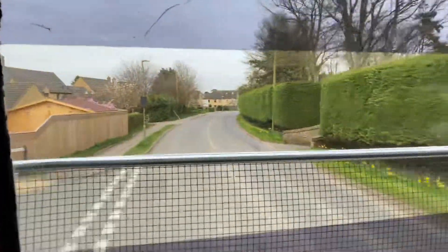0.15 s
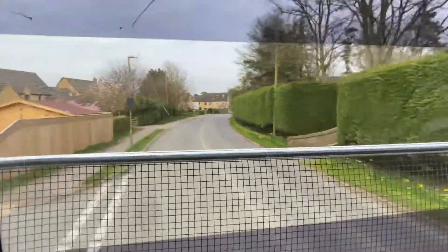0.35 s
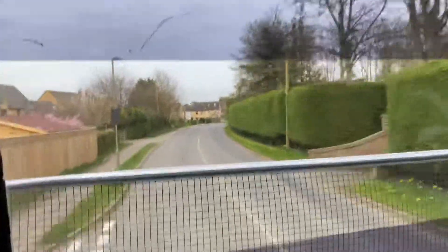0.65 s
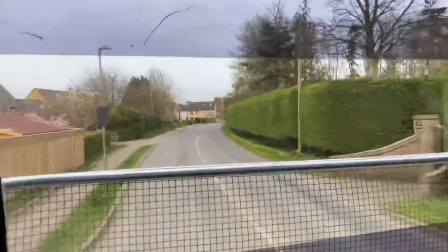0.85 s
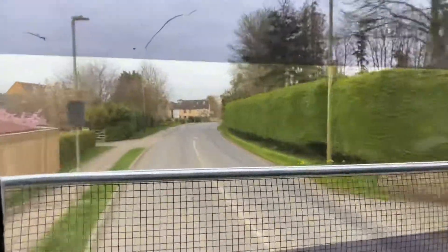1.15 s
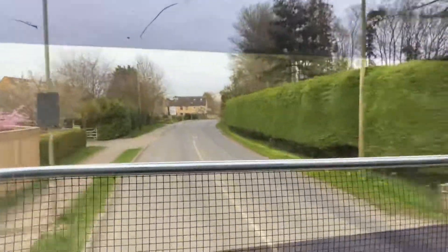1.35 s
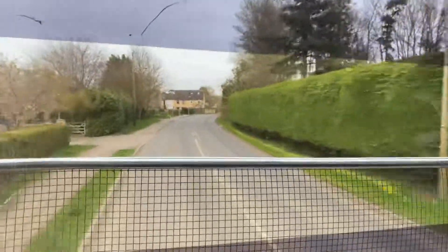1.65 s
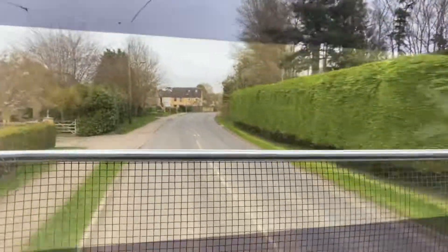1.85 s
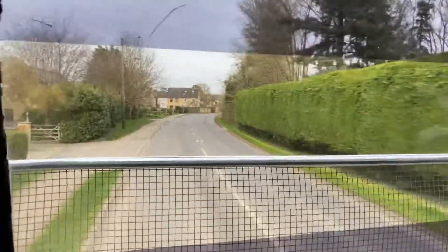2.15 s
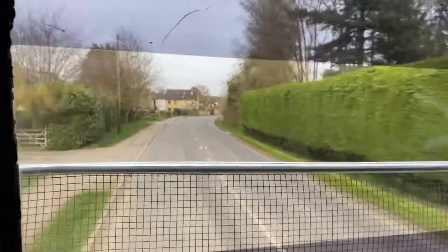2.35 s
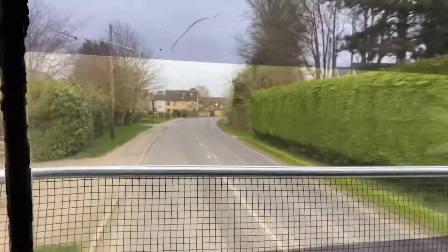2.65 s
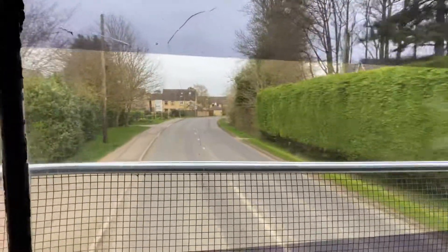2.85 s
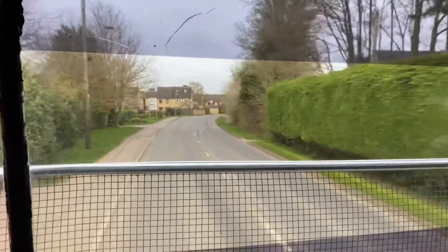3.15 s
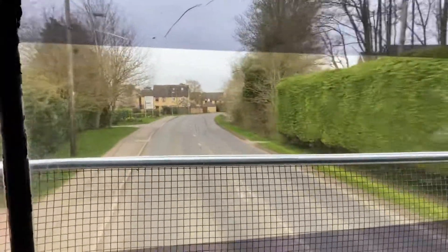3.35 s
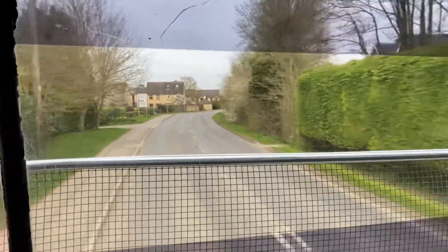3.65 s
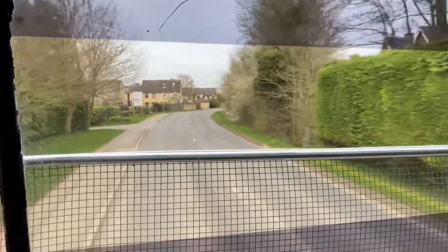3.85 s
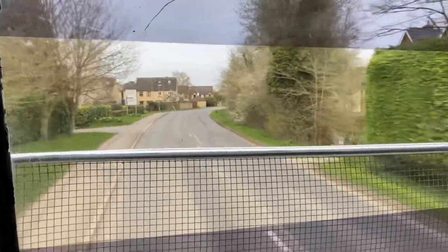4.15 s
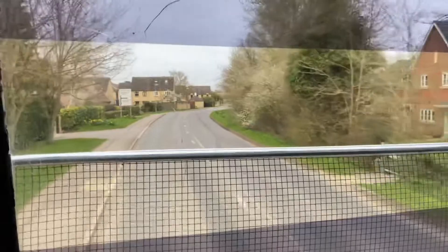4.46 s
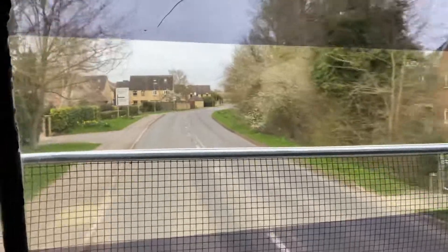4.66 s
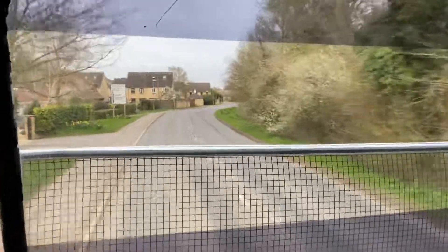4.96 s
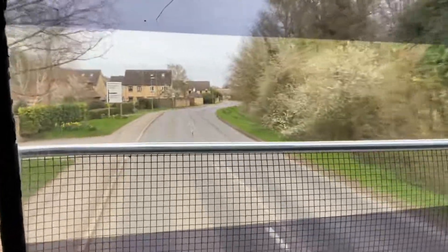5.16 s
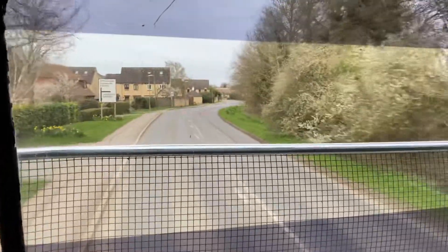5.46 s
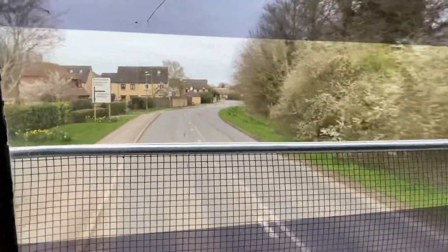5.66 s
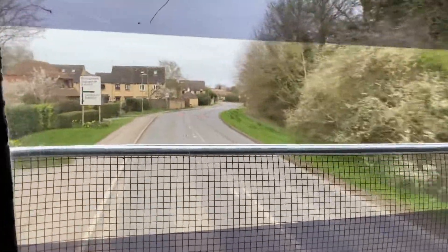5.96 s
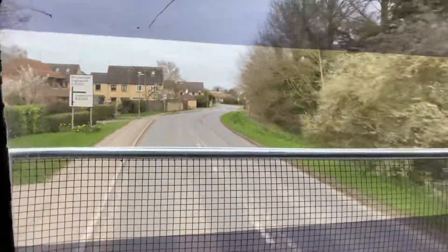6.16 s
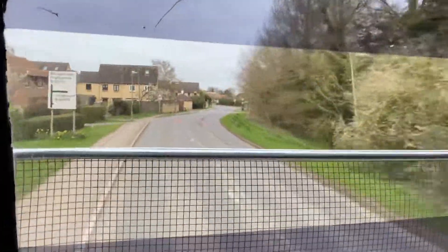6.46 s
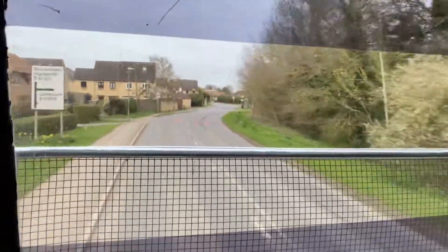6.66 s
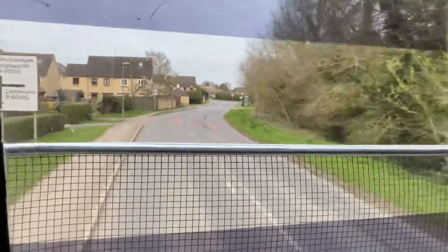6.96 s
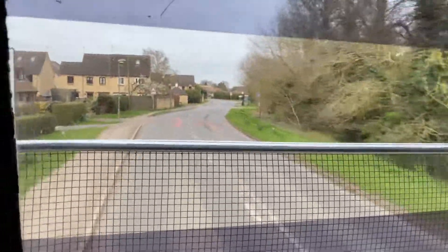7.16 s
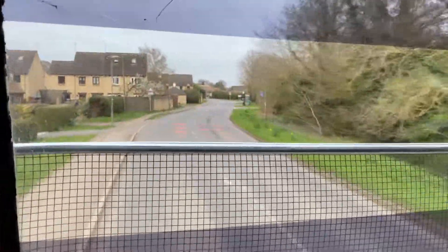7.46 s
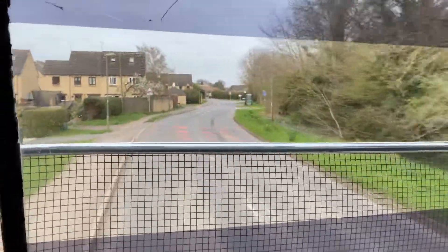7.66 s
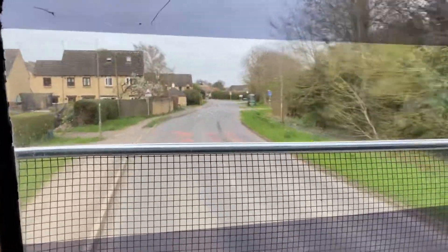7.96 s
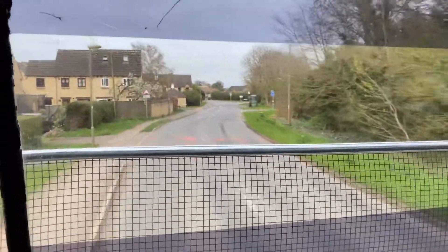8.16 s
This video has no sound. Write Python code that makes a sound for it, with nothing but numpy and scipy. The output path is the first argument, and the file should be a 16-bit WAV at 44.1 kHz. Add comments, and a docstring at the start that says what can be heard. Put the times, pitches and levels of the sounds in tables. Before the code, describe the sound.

Heard in stereo from inside a truck cab on a village road, a big two-stroke diesel drones steadily over low road rumble and clatter. Around one second bumps shake loose metal and plastic into a hard rattle with panel knocks. The note slowly sinks, swells under throttle near five and six seconds, rattles again near seven, then jumps up in a quick blip at the end.

```python
"""Stereo microphone inside the cab of a heavy two-stroke diesel truck on a village road, about 8 seconds.
Crank orders, summed sines, boom in the cab air over road rumble and engine clatter, both banded noise.
Around one second bumps set off rattle, ringing fittings and panel knocks; then the crank keeps slowing.
After a calmer stretch the throttle swells near five and six seconds and another rattle burst follows;
at the end the driver blips the throttle and the crank speed jumps."""
import sys
import numpy as np
from scipy import signal
from scipy.io import wavfile

SR = 44100
rng = np.random.default_rng(int(sys.argv[2]) if len(sys.argv) > 2 else 0)


def store_wav(level_fs):
    """Save 16-bit WAV to argv[1]."""
    pcm = np.round(np.clip(np.atleast_2d(level_fs), -1, 1) * 32767)
    wavfile.write(sys.argv[1], SR, pcm.T.astype(np.int16))


N = 366471

# crank speed sags, dips and jumps with the blip: (time [s], speed [turns per s])
CRANK_SPEED = [(0, 18.85), (.7, 18.97), (2.45, 18.02), (4.25, 17.18), (5.5, 16.71), (6.45, 16.63),
               (6.9, 16.27), (7.75, 16.0), (7.9, 14), (8.03, 15.9), (8.06, 18.3), (8.11, 20.8),
               (8.16, 22.5), (8.24, 25.4), (8.31, 26)]
# cab resonances that strengthen or weaken the orders passing them:
# (frequency [Hz], width [Hz], level change [dB])
CAB_RESONANCES = [(100, 6.1, -2.5), (114, 3.9, -1.5), (125.2, 25.6, 14.5), (253, 20, 11), (280, 30, 13),
                  (465.5, 5.4, 12.5), (703, 14, 12)]
# crank orders heard: (cycles per turn)
CRANK_ORDERS = (4, 5, 6, 7, 8, 9, 10, 11, 12, 13, 28, 37, 40, 44)
# each order off throttle at cruise, before the cab colours it: (rms level [dB])
ORDER_LEVELS = [-21.5, -31, -29.5, -30.5, -36, -35.5, -40.5, -44, -44.5, -41, -60, -52, -53, -43]
# how each order rises or sinks as the throttle opens: (change [dB per dB])
ORDER_THROTTLE_SHARES = [0.5, -0.6, -0.45, -0.35, 0.9, -0.2, -.1, 0, 1.15, -0.6, 1.1, .2, .2, .2]
# rise or fall of each order with crank speed: (slope [dB per octave])
ORDER_SPEED_SLOPES = [-4, 20, 28, 29.5, -1, 17, 6, -3, -6.5, 23.5, -7, -4, 3, 14]
CRUISE_TURNS_PER_S = 18
TWIST_RAD, TWIST_RAD_PER_DB = .004, .0005  # the crank twists ahead and behind, more under throttle
WAVER_DB = 2.0  # slow waver of the lowest order, less higher up
ROUGH_DB, ROUGH_SHARE = 1.0, 0.08  # common flutter [dB]; each order's own flutter [dB per throttle dB]
SIDE_PHASE_RAD = 0.047  # phase shift of each side, in opposite directions


def engine(throttle_db):
    """Sines at multiples of crank speed, each raised or lowered by throttle, speed and cab resonances."""
    times, speeds = np.transpose(CRANK_SPEED)
    turns = np.interp(np.arange(N) / SR, times, speeds)
    angle = 2 * np.pi * np.cumsum(turns) / SR
    twist = TWIST_RAD * drift(4) + TWIST_RAD_PER_DB * throttle_db * drift(20)
    octaves = np.log2(turns / CRUISE_TURNS_PER_S)
    out = 0
    for order, db, share, slope_db in zip(CRANK_ORDERS, ORDER_LEVELS, ORDER_THROTTLE_SHARES, ORDER_SPEED_SLOPES):
        change_db = share * throttle_db + slope_db * octaves
        for hz, width, centre_db in CAB_RESONANCES:
            change_db = change_db + centre_db / (1 + (2 * (order * turns - hz) / width) ** 2)
        waver_db = WAVER_DB * (CRANK_ORDERS[0] / order) ** 2 * drift(3.6)
        uneven_db = waver_db + ROUGH_SHARE * throttle_db * drift(25)
        start = rng.uniform(0, 2 * np.pi)
        apart = SIDE_PHASE_RAD * rng.choice([-1, 1]) * np.array([[1], [-1]])
        wave = np.sqrt(2) * np.sin(order * (angle + twist) + start + apart)
        out = out + from_db(db + change_db + uneven_db) * wave * lean(order * turns.mean())
    return out * from_db(ROUGH_DB * drift(18)), angle  # firing strength is uneven


# clatter as it reaches the cab, relative: (frequency [Hz], density [dB per Hz])
CLATTER_SPECTRUM = [(150, -51), (250, 6), (349, -11.5), (455, -5.5), (627, -8.5), (773, -5.5), (1080, -9),
                    (2140, -19.5), (5500, -30.5), (7000, -80), (9100, -94)]
PULSE_DEPTH, PULSE_DEPTH_PER_DB = .04, .02  # throb with the firings, deeper under throttle


def clatter(angle, clatter_db, throttle_db):
    """Combustion and valve noise through the bulkhead: banded noise pulsing four times a turn."""
    pulse = 1 + (PULSE_DEPTH + PULSE_DEPTH_PER_DB * throttle_db) * np.cos(4 * angle)
    return from_db(clatter_db) * coloured(CLATTER_SPECTRUM, lambda hz: pulse, patchy_db=1.5)


# loose metal and plastic in the cab, relative: (frequency [Hz], density [dB per Hz])
RATTLE_SPECTRUM = [(120, -12.5), (200, 7.5), (380, -5.5), (968, -12.5), (1040, -14.5), (1270, -10),
                   (2250, -20), (3760, -20), (6880, -26.5), (9230, -26), (11300, -34.5), (16000, -41)]
# single rattles, before their random spread and bass tilt: (time [s], level [dB])
RATTLE_TICKS = [(0.8774, 22.5), (1.018, 16), (1.135, 16.5), (1.231, 6), (1.255, 18), (1.2966, 24.5),
                (1.3895, 30.5), (1.439, 30.5), (1.52, 27.5), (1.669, 26), (2.049, 18), (2.105, 8),
                (2.495, 12), (2.947, 13.5), (3.05, 10), (3.173, 11.5), (3.626, 18.5), (3.662, 17),
                (3.795, 7), (3.856, 12.5), (3.9758, 25), (4.014, 8), (4.163, 13.5), (4.216, 18.5),
                (4.27, 2), (4.388, 12.5), (4.4386, 17), (4.515, 15), (4.572, 15), (4.6427, 17), (4.717, 13),
                (4.8254, 15), (4.958, 20), (5.1256, 11), (5.179, 10), (5.23, 13.5), (6.379, 9), (6.655, 23),
                (6.753, 17.5), (6.7904, 1), (6.811, 18), (6.8866, 16), (6.9098, 24), (7, 17.5),
                (7.055, 27.5), (7.0926, 20.5), (7.2065, 7), (7.299, 11)]
RATTLE_DB = -30  # rms of chatter and ticks together, before the trim colours them
TICK_BASS_DB_PER_OCTAVE = 2  # ticks thin out below the mid range


def rattle(shake_db):
    """Loose parts touch at random while shaken, plus single ticks: decaying bursts of banded noise."""
    contacts = np.flatnonzero(rng.random(N) < 260 / SR)
    sizes_db = 1.5 * np.minimum(rng.exponential(1, len(contacts)), 3)
    times, tick_db = np.transpose(RATTLE_TICKS)
    tick_at = np.round(times * SR).astype(int)

    def gate(hz):
        """Envelope of all contacts in one band; each has its own colour, harder shaking is brighter."""
        chatter, ticks = np.zeros((2, N))
        chatter[contacts] = from_db(sizes_db + rng.normal(0, 5.5, len(contacts)))
        bass_db = TICK_BASS_DB_PER_OCTAVE * min(0, np.log2(hz / 1800))
        ticks[tick_at] = from_db(tick_db + rng.normal(0, 2.5, len(tick_at)) + bass_db)
        shaken = from_db(shake_db) * rms_one(1.3 + bursts(chatter, t60=0.045))
        brightness_db = 0.04 * shake_db * np.log2(hz / 4000)
        return (shaken + bursts(ticks, t60=0.095)) * from_db(brightness_db)

    return coloured(RATTLE_SPECTRUM, gate, patchy_db=.5) * from_db(RATTLE_DB)


FITTINGS_LOW_HZ, FITTINGS_HIGH_HZ, FITTINGS_COUNT = 1900, 8500, 18  # nominal pitch range
TOUCHES_PER_S, RING_CYCLES = 500, 45  # touches of all fittings together; cycles to ring down by 60 dB
FITTINGS_DB, FITTINGS_DB_PER_OCTAVE = -43, -3  # rms level before the trim; tilt with pitch


def fittings(shake_db):
    """Shaken brackets and catches touch at random; each rings at one pitch, in one place in the cab."""
    pitches = np.geomspace(FITTINGS_LOW_HZ, FITTINGS_HIGH_HZ, FITTINGS_COUNT)
    pitches = pitches * rng.uniform(.96, 1.04, FITTINGS_COUNT)
    touching = rng.random(N) < TOUCHES_PER_S / SR
    sizes = from_db(shake_db + 2 * np.minimum(rng.exponential(1, N), 4)) * touching
    dealt = rng.integers(0, FITTINGS_COUNT, N)  # which fitting each touch falls to
    out = 0
    for k, hz in enumerate(pitches):
        tilt = from_db(FITTINGS_DB_PER_OCTAVE * np.log2(hz / 2000))
        place = tilt * np.array([[1], [rng.uniform(-1, 1)]])
        place = place[::(-1) ** k]  # the stronger side alternates
        out = out + place * ring(sizes * (dealt == k), hz, RING_CYCLES / hz)
    return from_db(FITTINGS_DB) * rms_one(out)


# trim panels colour clatter, rattle and fittings: (frequency [Hz], width [Hz], lift [dB])
TRIM_RESONANCES = [(755, 130, 5.5), (1310, 150, 2), (2200, 300, 5.5), (6400, 600, 5)]


def through_trim(x):
    """Each trim panel resonance adds its ringing to what passes."""
    out = x
    for hz, width, lift_db in TRIM_RESONANCES:
        ringing = signal.lfilter(*signal.iirpeak(hz, hz / width, fs=SR), x)
        out = out + (from_db(lift_db) - 1) * ringing
    return out


# small metal parts that ring out: (time [s], frequency [Hz], level [dB], decay by 60 dB [s])
SMALL_PARTS = [(2.344, 2600, -39, .04), (3.778, 2500, -38, .04), (3.875, 5200, -49, .2),
               (4.643, 2700, -28, .05), (4.65, 2250, -27, .06), (4.955, 4600, -33, .05),
               (4.975, 2400, -34, .05), (5.058, 6400, -36, .08), (5.085, 4650, -38, .15),
               (5.128, 2300, -33, .05), (6.888, 2750, -32, .06), (7.002, 4640, -32, .17),
               (7.053, 2100, -29, .06), (7.14, 4620, -39, .3)]


def pings():
    """One touch and any lighter ones in the next 12 ms set each small part ringing."""
    out = 0
    for s, hz, db, t60 in SMALL_PARTS:
        start, end = round(s * SR), round((s + .012) * SR)
        clicks = np.zeros((2, N))
        clicks[:, start:end] = [[.35], [.2]]  # lighter touches, left and right
        clicks *= rng.random(N) < 300 / SR
        clicks[:, start] = 1
        out = out + from_db(db) * ring(clicks, hz, t60)
    return out


# knocks on the panel, relative strength: (time [s], level [dB])
PANEL_KNOCKS = [(0.878, -21), (1.124, -12.5), (1.254, -20), (1.297, -15), (1.366, -15), (1.409, -15.5),
                (1.474, -17.5), (1.52, -17), (3.632, -21.5), (3.976, -6.5), (4.161, -30), (4.416, -19),
                (4.642, -25), (6.377, -10.5), (6.666, -28), (6.749, -23), (6.794, -17.5), (6.814, -19),
                (6.909, -20), (7.298, -17.5)]
# bounces within one knock: (delay [s], level [dB])
KNOCK_BOUNCES = [(0, 2), (.0108, -1), (.0216, -10), (.034, -20)]
# modes of the panel, relative strength: (frequency [Hz], level [dB], decay by 60 dB [s])
PANEL_MODES = [(278, -1, 0.08), (480, -9, 0.045), (742, 1, 0.045), (875, -3, 0.045), (990, -5, 0.03),
               (1320, -11, 0.022), (1660, -12, 0.04), (2072, -11.5, 0.058), (2220, -13.5, 0.054)]


def panel():
    """Every knock lands in a few uneven bounces, each ringing the panel modes with strengths of its own."""
    times, knock_db = np.transpose(PANEL_KNOCKS)
    count = len(times)
    bounces = []
    for lag, db in KNOCK_BOUNCES:
        landing = times + lag * rng.uniform(.98, 1.02, count)
        bounces.append(((landing * SR).astype(int), db))
    out = 0
    for hz, mode_db, t60 in PANEL_MODES:
        clicks = np.zeros((2, N))
        for at, db in bounces:
            spread_db = rng.normal(0, 1.5, count) + rng.normal(0, 1, (2, count))  # shared, then per side
            clicks[:, at] = from_db(knock_db + db + mode_db - 5.0 + spread_db)
        out = out + lean(hz) * ring(clicks, hz, t60)
    return signal.lfilter([.3], [1, -.7], out)  # a padded contact dulls the knock


# road rumble as heard in the cab, relative: (frequency [Hz], density [dB per Hz])
RUMBLE_SPECTRUM = [(8.8, -20), (15, -50), (49, 0), (75, 2.5), (135, -5.5), (179, -10.5), (270, -19.5),
                   (362, -28.5), (500, -28), (650, -63)]
RUMBLE_DB, RUMBLE_SHAKE_SHARE = -21.5, 0.3  # level on calm road; rise [dB per dB of shaking]


def rumble(shake_db):
    """Road rumble: low banded noise that rises on rough patches."""
    level_db = RUMBLE_DB + RUMBLE_SHAKE_SHARE * shake_db
    return from_db(level_db) * coloured(RUMBLE_SPECTRUM, lambda hz: 1, patchy_db=2.0)


# the cab air booms to the road, level on calm road: (frequency [Hz], width [Hz], level [dB])
CAB_AIR = (60.6, 6.7, -22.5)
BOOM_SHAKE_SHARE = 0.35  # rise [dB per dB of shaking]


def boom(shake_db):
    """Road shocks drive the lowest air resonance of the cab: noise through one narrow ringing mode."""
    hz, width, db = CAB_AIR
    t60 = np.log(1000) / (np.pi * width)
    mid, side = ring(rng.standard_normal((2, N)), hz, t60)
    level_db = db + BOOM_SHAKE_SHARE * shake_db + 2.5 * drift(1.2)
    return from_db(level_db) * lean(hz) * rms_one(mid + 0.37 * side * [[1], [-1]])


# the driver opens the throttle; each order follows the throttle swell by its own share:
# (start [s], hold [s], throttle swell [dB], clatter change [dB])
THROTTLE_OPENINGS = [(0, 0.78, 4.5, 1), (4.933, 1, 4, 0.5), (5.923, 0.74, 8.5, 2), (7.158, 0.39, 0.5, -3),
                     (8.035, 0.36, 14.5, 3.5)]
THROTTLE_RISE_DB_PER_S, THROTTLE_FALL_DB_PER_S = 243, 91
CLATTER_LEAD_S = 0.09  # combustion hardens before the note swells
CLATTER_RISE_DB_PER_S, CLATTER_FALL_DB_PER_S = 35, 20


def driver():
    """Throttle openings as level swells: one curve for the orders, an earlier, slower one for the clatter."""
    note = [(s, hold, db) for s, hold, db, _ in THROTTLE_OPENINGS]
    hardening = [(s - CLATTER_LEAD_S, hold + CLATTER_LEAD_S, db) for s, hold, _, db in THROTTLE_OPENINGS]
    throttle_db = swells(note, THROTTLE_RISE_DB_PER_S, THROTTLE_FALL_DB_PER_S)
    load_db = swells(hardening, CLATTER_RISE_DB_PER_S, CLATTER_FALL_DB_PER_S)
    return throttle_db, load_db


# rough patches of road shake the cab: (start [s], hold [s], level above calm [dB])
ROUGH_PATCHES = [(0, 1.3, 2.5), (.9, 0.88, 11), (1.28, 0.22, 22.5), (1.4, 0.072, 22), (2.0, 0.37, 5.5),
                 (2.9, 0.43, 3), (3.6, 0.074, 7.5), (4.2, 0.49, 8), (4.87, 0.23, 16), (6.2, 0.1, 6),
                 (6.64, 0.44, 13.5), (7.8, 0.16, 9.5), (8.2, 0.15, 11)]
SHAKE_RISE_DB_PER_S, SHAKE_FALL_DB_PER_S = 113, 70


def rough_road():
    """Shaking of the cab in dB above calm road, swelling around each rough patch."""
    return swells(ROUGH_PATCHES, SHAKE_RISE_DB_PER_S, SHAKE_FALL_DB_PER_S)


def swells(rows, rise_db_per_s, fall_db_per_s):
    """Each row reaches its level at its start, holds and falls; the highest of all rows and 0 dB counts."""
    t, out = np.arange(N) / SR, np.zeros(N)
    for start, hold, db in rows:
        before_db = rise_db_per_s * np.maximum(start - t, 0)
        after_db = fall_db_per_s * np.maximum(t - start - hold, 0)
        out = np.maximum(out, db - before_db - after_db)
    return out


# likeness of the two sides at the microphone: (frequency [Hz], left-right likeness [-1 to 1])
SIDE_LIKENESS = [(60, 0.92), (130, 1), (290, 0.12), (640, 0.43), (1400, -0.46), (3100, 0.2), (7000, -0.077),
                 (15000, 0.016)]


def coloured(spectrum, gate, patchy_db):
    """Narrow bands of gated stereo noise, each with its own level, flicker and likeness; mid rms 1."""
    low, top = spectrum[0][0], min(spectrum[-1][0], 17000)
    edges = np.geomspace(low, top, round(2.2 * np.log2(top / low)) + 1)
    white = rng.standard_normal((2, 2, N))  # neighbouring bands take different noise
    out = 0
    for k, (lo, hi) in enumerate(zip(edges, edges[1:])):
        hz = np.sqrt(lo * hi)
        band = signal.butter(2, [lo, hi], "band", fs=SR, output="sos")
        mid, side = signal.sosfilt(band, white[k % 2] * gate(hz))
        alike = np.clip(at_hz(SIDE_LIKENESS, hz), -1, 1)
        stereo = np.sqrt(1 + alike) * mid + np.sqrt(1 - alike) * side * [[1], [-1]]
        out = out + from_db(at_hz(spectrum, hz) + patchy_db * drift(12.4)) * lean(hz) * stereo
    return out / np.sqrt(np.mean(out.mean(axis=0) ** 2))


# balance of the two sides at the microphone: (frequency [Hz], left minus right [dB])
SIDE_LEAN = [(100, 4.5), (600, 4.5), (1400, 1.5), (3000, 1.5), (12000, 0.5)]


def lean(hz):
    """Left and right gains at one pitch."""
    return from_db(at_hz(SIDE_LEAN, hz) * np.array([[.5], [-.5]]))


def ring(clicks, hz, t60):
    """A damped two-pole resonator: a unit click sets a sine of starting height 1 ringing."""
    r, w = from_db(-60 / (t60 * SR)), 2 * np.pi * hz / SR
    return signal.lfilter([0, np.sin(w)], [1, -2 * r * np.cos(w), r * r], clicks + 1e-18)


def bursts(sizes, t60):
    """Each click starts an envelope that falls by 60 dB in t60 seconds."""
    return signal.lfilter([1], [1, -from_db(-60 / (t60 * SR))], sizes + 1e-18)


def drift(rate):
    """Slow chance with spread 1: noise through two equal low-pass poles at rate [Hz]."""
    r = np.exp(-80 * np.pi * rate / SR)  # one step per 40 samples
    slow = signal.lfilter([1], [1, -2 * r, r * r], rng.standard_normal(N // 40 + 2002))[2000:]
    return np.interp(np.arange(N) / 40, np.arange(len(slow)), rms_one(slow))


def at_hz(points, hz):
    """Read a (frequency [Hz], value) table on a log axis."""
    table_hz, values = np.transpose(points)
    return np.interp(np.log(hz), np.log(table_hz), values)


def from_db(db):
    """Decibels to gain."""
    return np.exp(np.asarray(db) * (np.log(10) / 20))


def rms_one(x):
    """Scale to rms 1."""
    return x / np.sqrt(np.mean(x ** 2) + 1e-20)


CLATTER_DB, CLATTER_SHAKE_SHARE = -30.5, 0.023  # off throttle on calm road, before the trim; rise with shaking
ORDER_SHAKE_SHARE = -.15  # the clean note sinks while the cab is shaken


def scene():
    """All sources in the cab, those behind the trim coloured by it."""
    throttle_db, load_db = driver()
    shake_db = rough_road()
    orders, angle = engine(throttle_db)
    note = from_db(ORDER_SHAKE_SHARE * shake_db) * orders
    clatter_db = CLATTER_DB + load_db + CLATTER_SHAKE_SHARE * shake_db
    trimmed = through_trim(clatter(angle, clatter_db, throttle_db) + rattle(shake_db) + fittings(shake_db))
    road = rumble(shake_db) + boom(shake_db)
    return note + trimmed + pings() + panel() + road


CUTOFF_HZ = 16400  # full attenuation from here up


def record(dry):
    """The microphone chain: peaks are rounded, the top is cut."""
    top_cut = signal.cheby2(12, 70, CUTOFF_HZ, fs=SR, output="sos")
    return signal.sosfilt(top_cut, np.tanh(dry))


dry = scene()
out = record(dry)
store_wav(out)
```